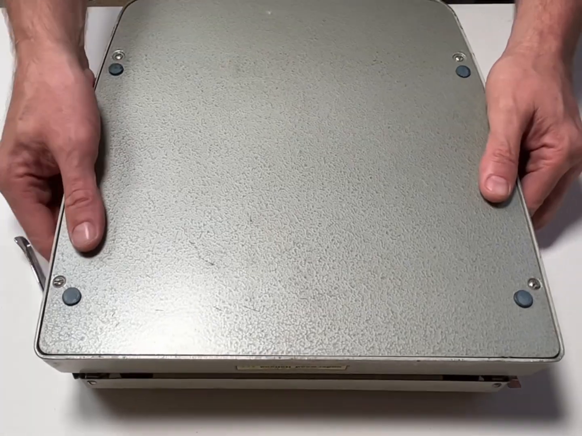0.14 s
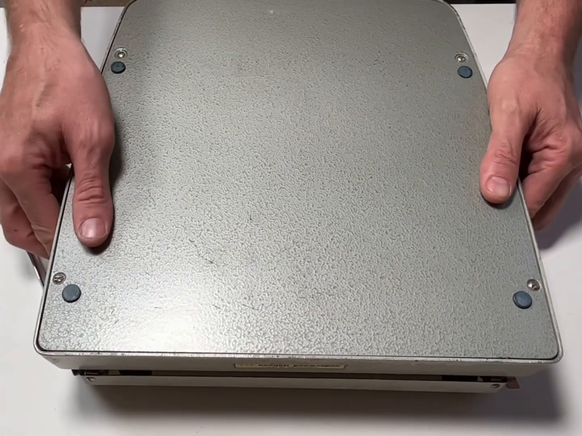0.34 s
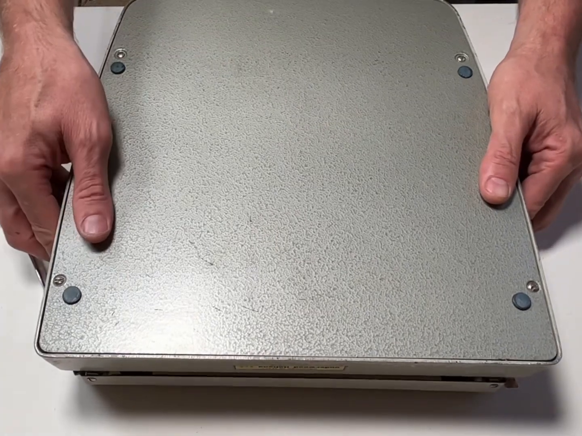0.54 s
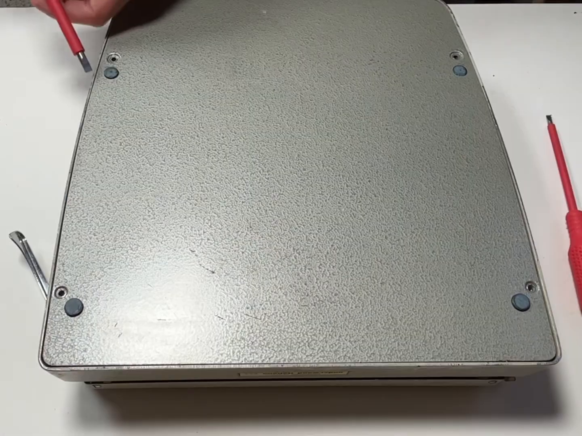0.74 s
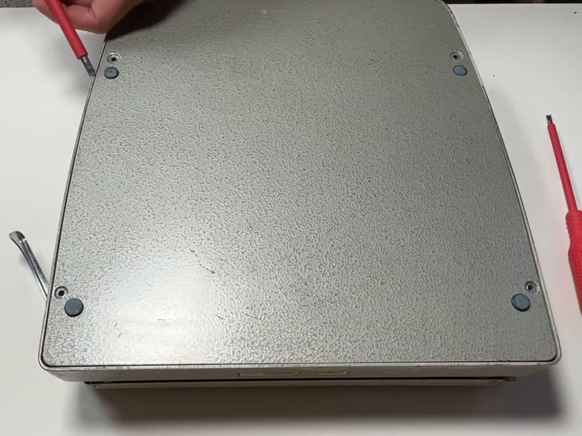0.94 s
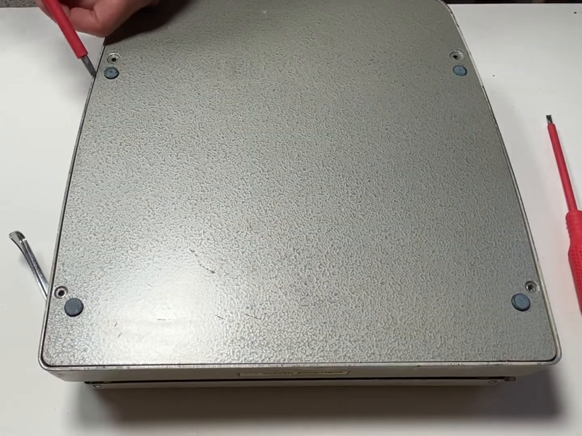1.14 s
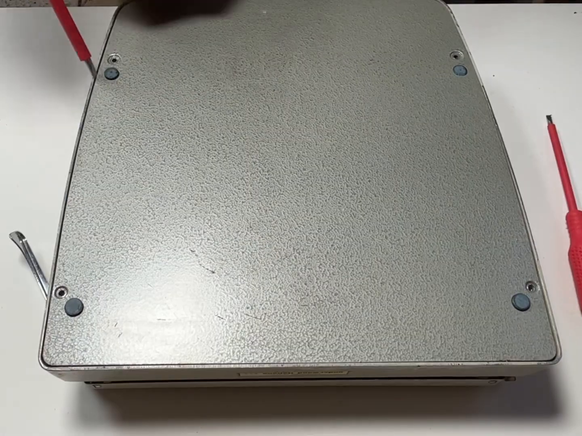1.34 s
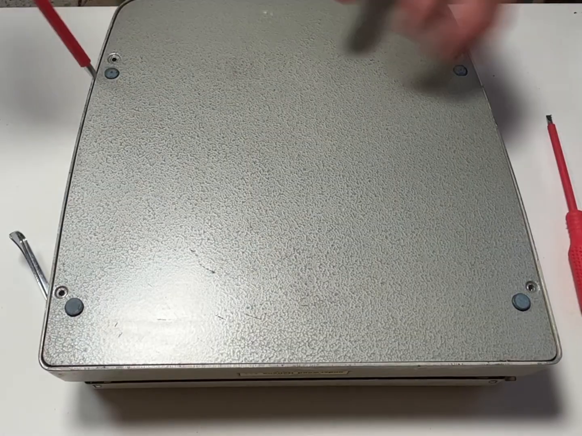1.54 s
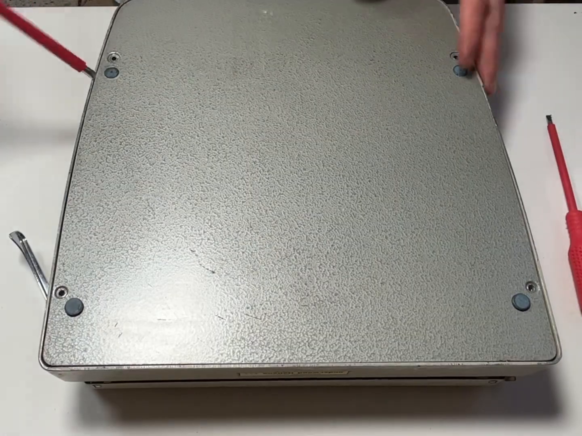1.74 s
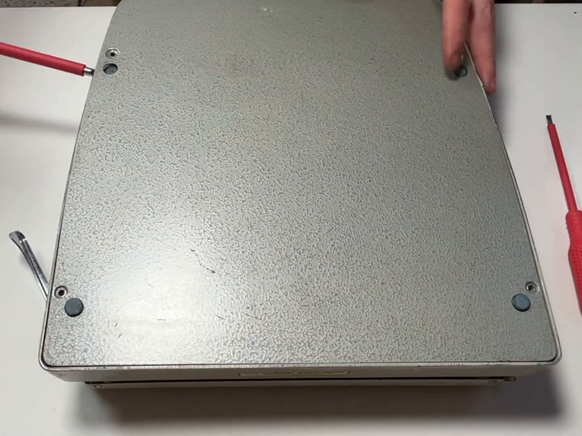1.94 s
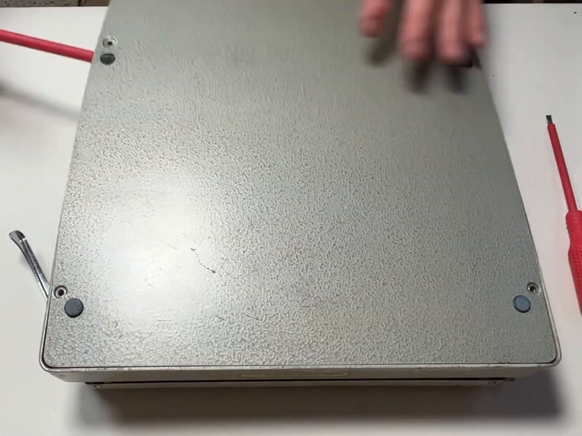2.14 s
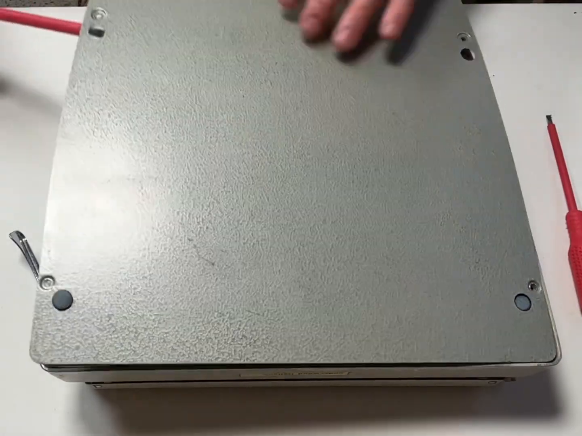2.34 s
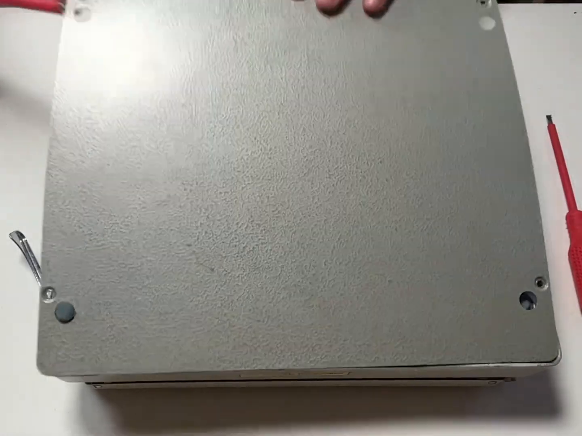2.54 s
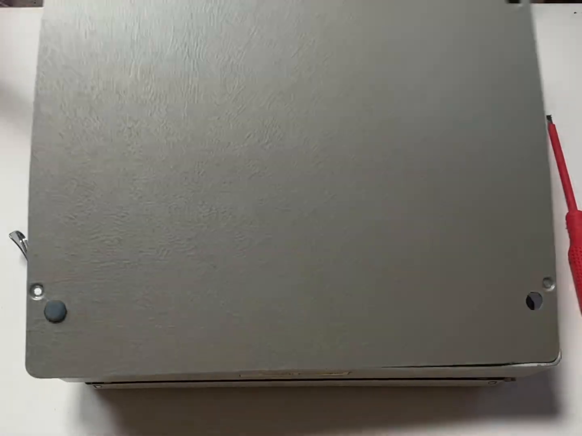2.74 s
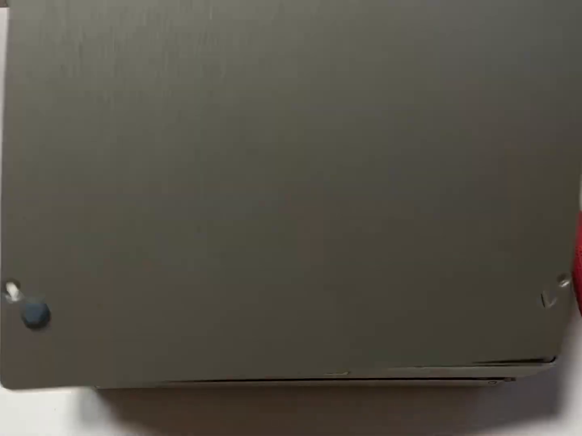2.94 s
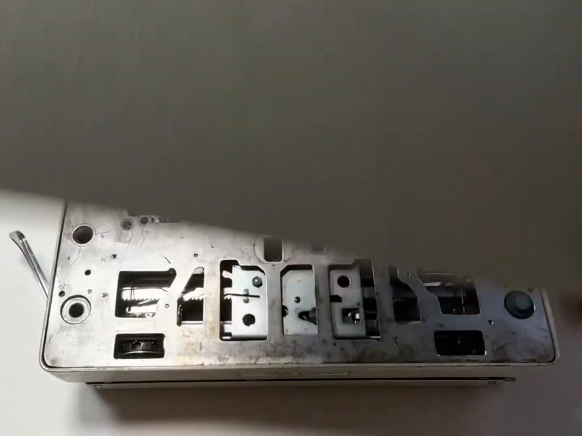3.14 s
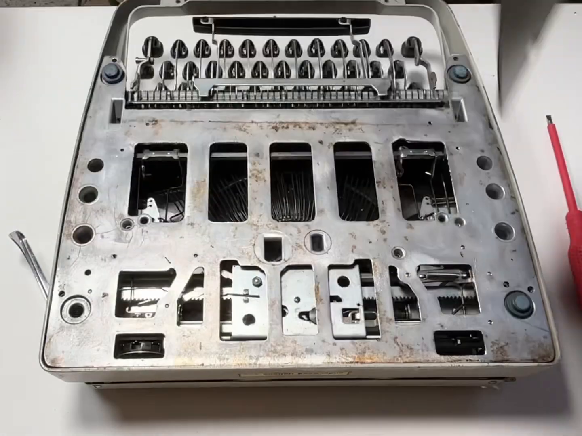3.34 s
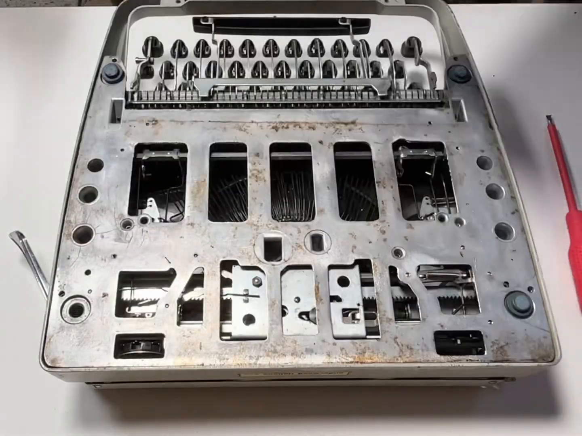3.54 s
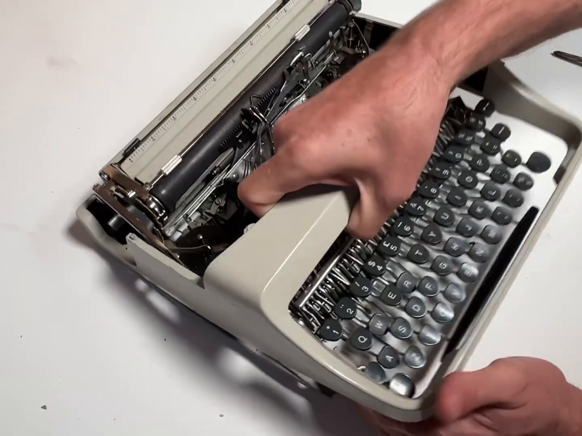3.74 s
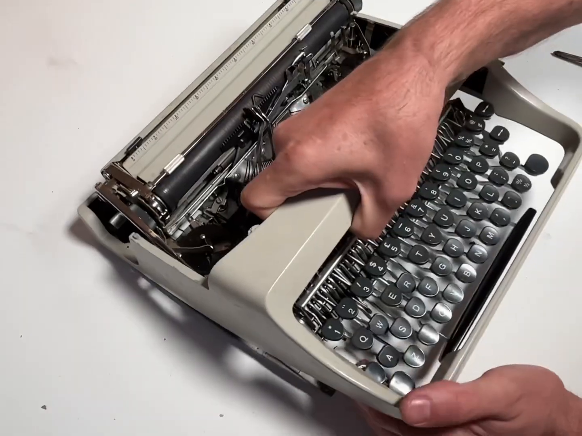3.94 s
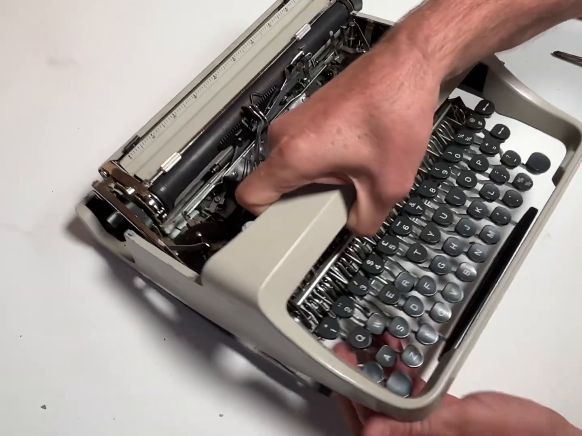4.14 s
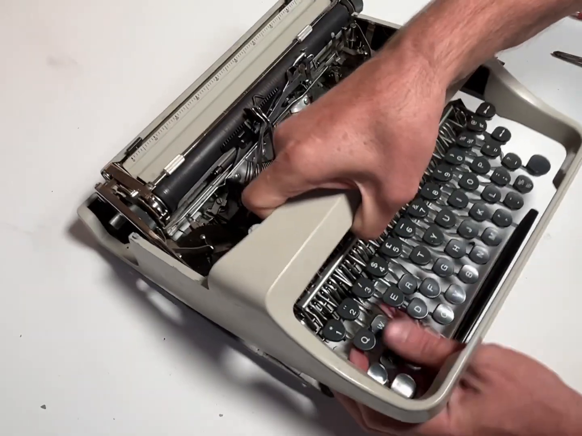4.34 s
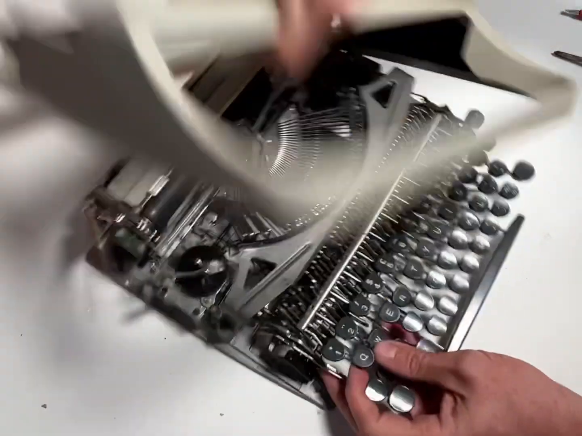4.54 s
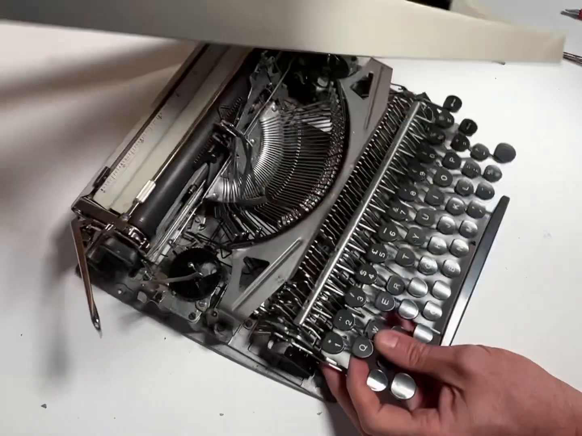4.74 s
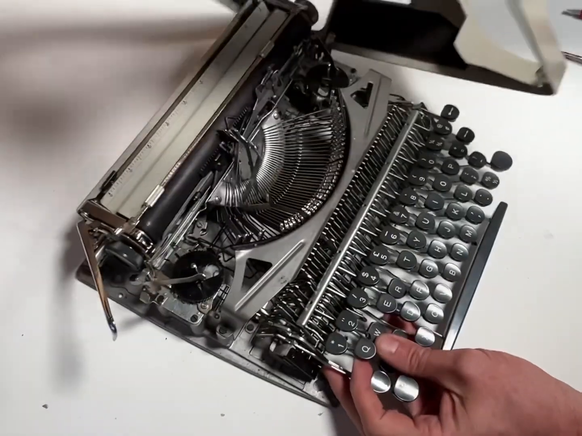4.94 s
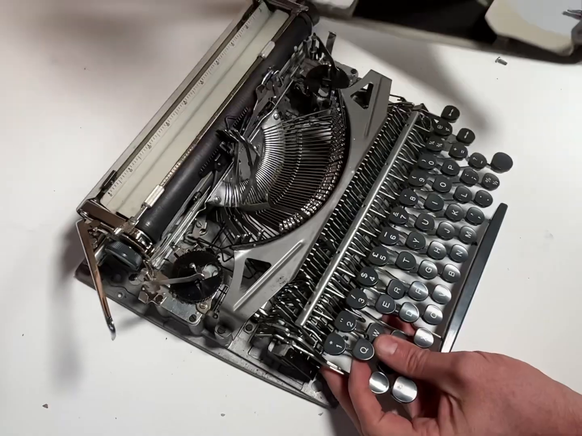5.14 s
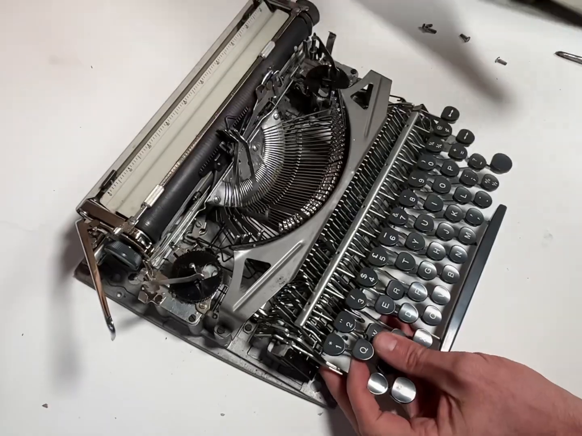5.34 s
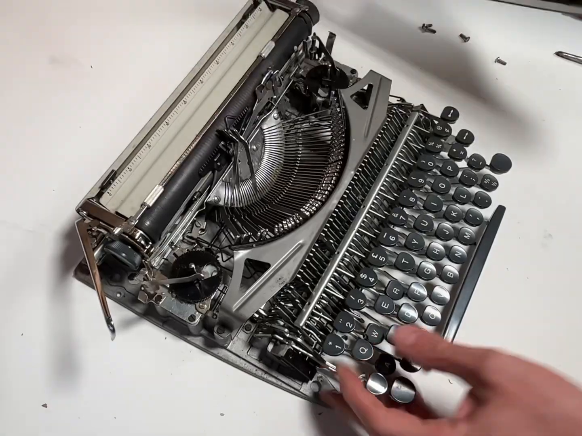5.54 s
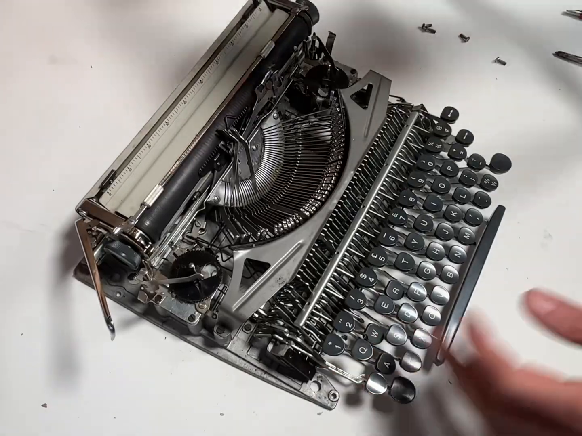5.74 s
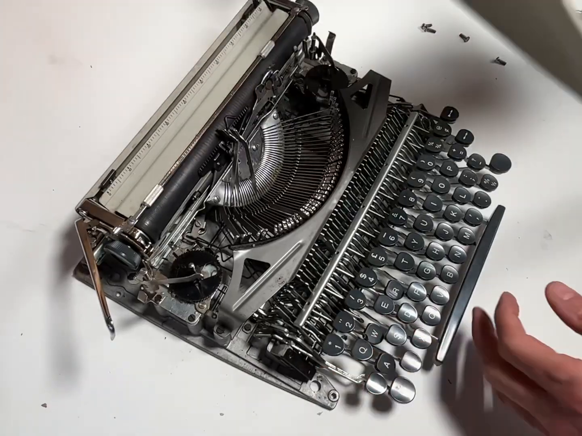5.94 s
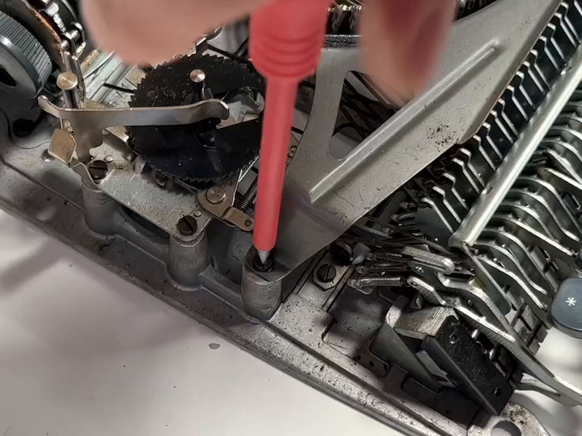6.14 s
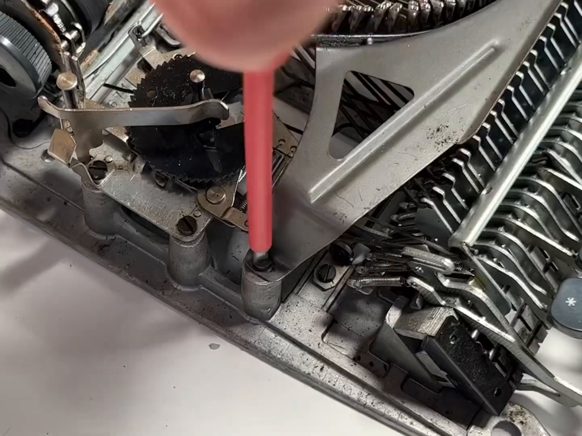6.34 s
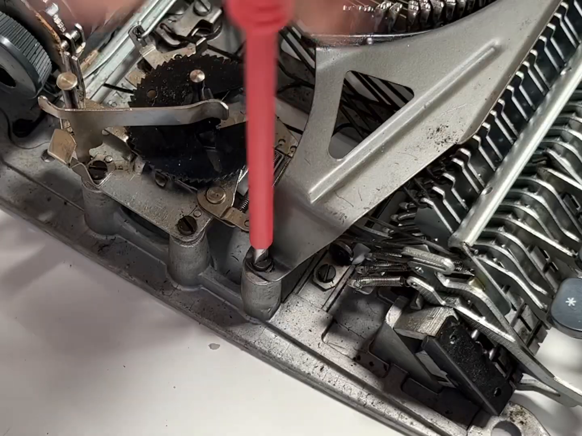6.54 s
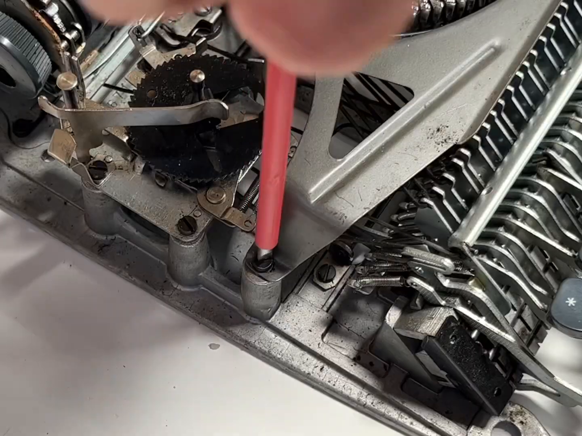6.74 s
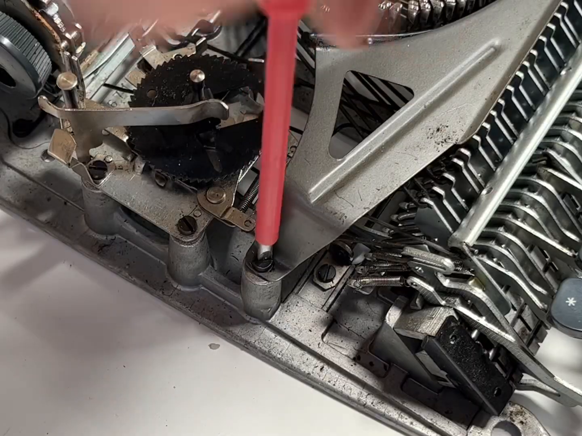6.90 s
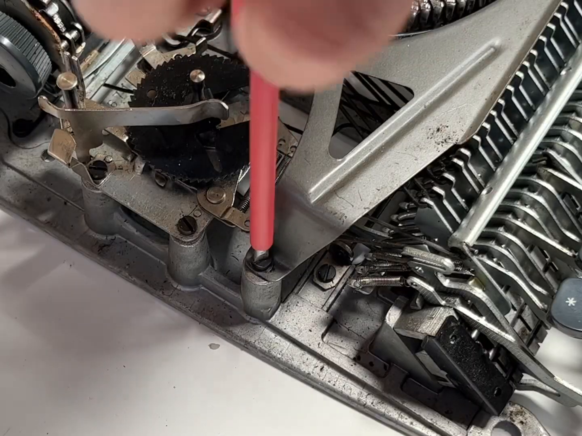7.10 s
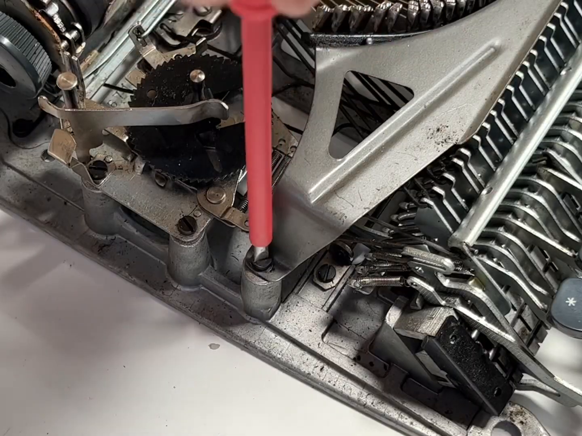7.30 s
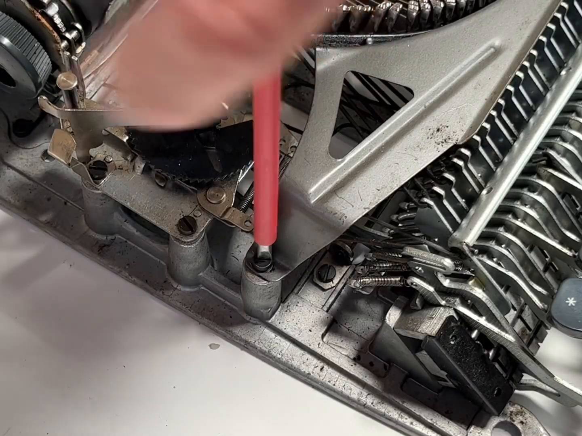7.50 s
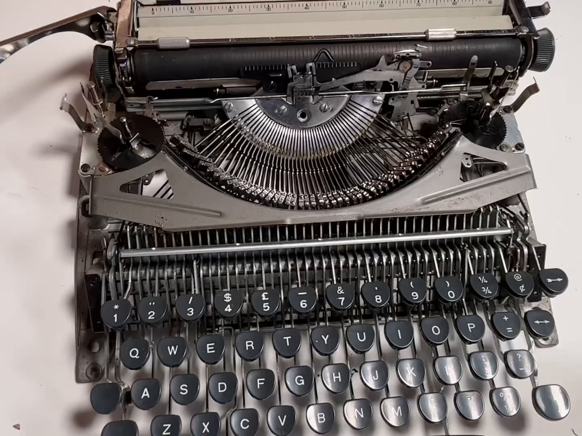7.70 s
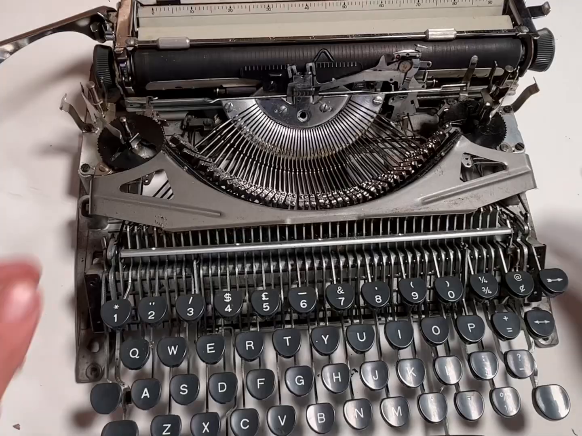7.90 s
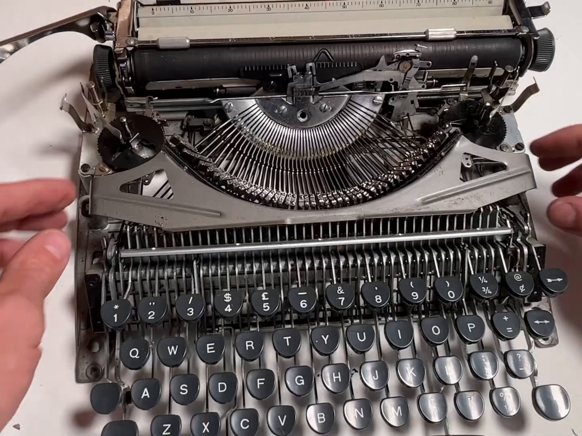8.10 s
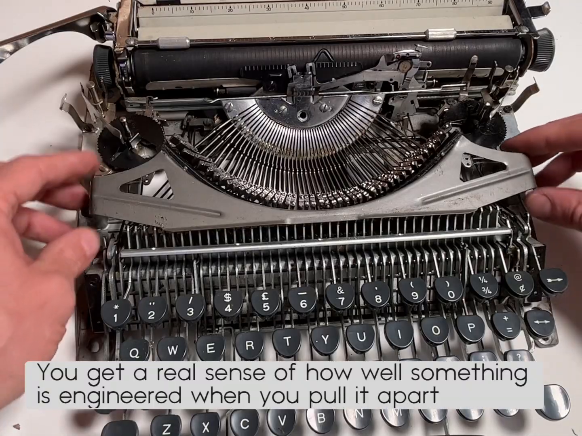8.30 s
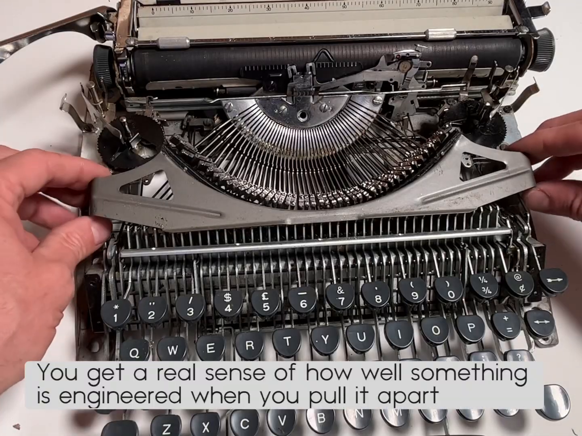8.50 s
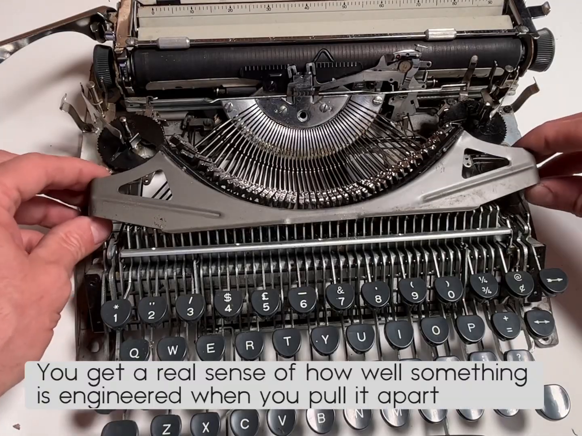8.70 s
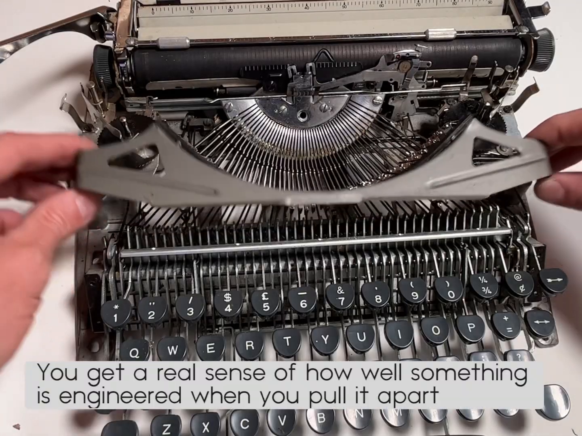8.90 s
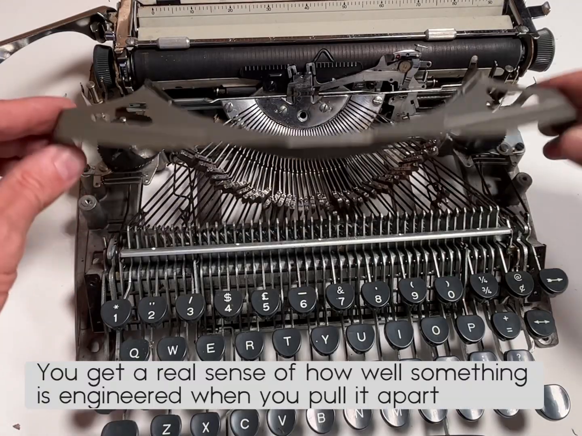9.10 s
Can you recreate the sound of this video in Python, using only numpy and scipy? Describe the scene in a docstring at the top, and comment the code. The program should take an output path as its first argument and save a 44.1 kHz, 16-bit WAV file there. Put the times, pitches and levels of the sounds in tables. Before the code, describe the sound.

A typewriter being taken apart: a sharp double clack and thud first, then scattered ticks, dull knocks and rustling of sheet metal. Midway a shell drags harshly over the mechanism, banging the bench twice in quick bursts. Afterwards only light rubbing, faint scratchy twists under a low outdoor hum, and a final pair of light ringing clicks. Abrupt joins change the low room rumble, heard in close stereo.

```python
"""A typewriter is taken apart on a bench: metal parts click and ring as short noise and fading tones.
Hands and covers scrape as noise gated by tiny slips; the bench top thuds as low tones under each shove.
A street rumbles through the walls as flickering bands of noise; in the fourth of five joined passages
an engine outside drones as one unsteady low tone. Two microphone ports hear it all in stereo."""
import sys
import numpy as np
from scipy import signal
from scipy.fft import rfft, irfft
from scipy.io import wavfile
from scipy.ndimage import uniform_filter1d

SR = 44100
rng = np.random.default_rng(int(sys.argv[2]) if len(sys.argv) > 2 else 0)


def transcribe(signal):
    """Save signal, clipped to [-1, 1], as a 16-bit WAV file at the path in sys.argv[1]."""
    frames = np.atleast_2d(signal).T
    limited = np.clip(frames, -1, 1)
    pcm = np.round(limited * 32767).astype(np.int16)
    wavfile.write(sys.argv[1], SR, pcm)


N = 403956
T = np.arange(N) / SR  # time of every sample [s]
F = np.fft.rfftfreq(N, 1 / SR)  # pitches of the whole-length spectrum [Hz]


def undb(db):
    """Turn decibels into a plain factor."""
    return 10 ** (np.asarray(db) / 20)


def curve(tables):
    """Join tables and read their columns at every sample, with straight lines between rows."""
    s, *columns = np.vstack(tables).T
    return [np.interp(T, s, column) for column in columns]


def unit(x):
    """Scale a sound to an average (RMS) level of 1."""
    return x / np.sqrt(np.mean(x ** 2))


def walk(rate):
    """Wander at random: levels held for 1 / rate seconds, then smoothed twice."""
    k = int(SR / rate)
    held = np.repeat(rng.standard_normal(N // k + 1), k)
    return 1.3 * uniform_filter1d(uniform_filter1d(held, k), k)[:N]


def band(x, lo_hz, hi_hz, order=2):
    """Keep only the pitches between two edges."""
    edges = [lo_hz, min(hi_hz, .45 * SR)]
    return signal.sosfilt(signal.butter(order, edges, "band", fs=SR, output="sos"), x)


def ring(modes, t, spread_db, detune):
    """Strike an object: each mode is a fading tone, with its own detuning and sign in the two rows."""
    hz, db, t60 = np.transpose(modes)[:, None, :, None]
    luck = rng.standard_normal((3, 2, len(modes), 1))
    strength = undb(db + spread_db * luck[0, :1])  # shared by both rows
    fade = np.exp(-np.log(1000) * t / np.maximum(t60, .005))
    sign = np.sign(luck[2])
    sign[0] = 1
    tones = np.sin(2 * np.pi * hz * (1 + detune * luck[1]) * t)
    return (sign * strength * fade * tones).sum(axis=1)


def slips(rate, spread_db, smooth, slip_s, size):
    """Rub two surfaces: noise gated by short slips of uneven strength over a smooth slide."""
    force = undb(spread_db * rng.exponential(size=size)) * (rng.random(size) < rate / SR)
    fading_slips = signal.lfilter([1], [1, -np.exp(-1 / (slip_s * SR))], force)
    grip = smooth + unit(fading_slips)
    return unit(grip * rng.standard_normal((2, size)))


# where each passage starts, then the end of the last: (time [s])
CUTS_S = [0, .5817, 3.604, 6.159, 7.684, 9.2]


def add(out, s, sound):
    """Lay a sound in at s seconds; the next join between passages chops its tail."""
    i = int(s * SR)
    next_cut = min(int(c * SR) for c in CUTS_S if c > s)
    n = min(sound.shape[1], next_cut - i, N - i)
    out[:, i:i + n] += sound[:, :n]


# the colour of the room when quiet, with traffic, and when still: (pitch [Hz], relative level [dB])
QUIET = [(28, -20), (48, -1.5), (70, -2.5), (130, -16), (280, -22), (380, -22), (900, -25.5), (1800, -34.5),
         (3000, -45), (5000, -57)]
TRAFFIC = [(28, -22), (48, -7), (75, -4.5), (130, -12), (360, -26), (800, -20.5), (1270, -33), (1800, -27),
           (2600, -42), (5000, -54)]
STILL = [(28, -42), (48, -2), (130, -12.5), (300, -5.5), (420, -8), (960, -14.5), (1800, -17), (3000, -21),
         (5000, -41)]
# how the room swells, one list per passage: (time [s], rumble level [dB], hush level [dB])
SWELL = [
    [(0.0, -36.5, -42), (0.398, -39, -45.5), (0.58, -38.5, -42)],
    [(0.59, -44.5, -52), (3.49, -46.5, -56.5), (3.6, -45, -55)],
    [(3.61, -42, -52), (4.55, -40.5, -48), (6.15, -41.5, -49)],
    [(6.17, -43, -46), (7.464, -43, -48.5), (7.68, -42, -49)],
    [(7.69, -51.5, -55.5), (8.0, -53.5, -55.5), (9.16, -46, -54.5)],
]


def room():
    """Street rumble and hush: overlapping noise bands flicker alone, coloured and swelling per passage."""
    colours = [QUIET, QUIET, QUIET, TRAFFIC, STILL]
    noise = rfft(rng.standard_normal((2, N)))
    passage = np.searchsorted(CUTS_S, T, "right") - 1
    octave = np.log2(np.maximum(F, 1))
    rumble = hush = 0
    for hz in 28 * 2 ** np.arange(0, 7.6, .5):  # band centres half an octave apart
        share = np.cos(np.pi * np.clip(octave - np.log2(hz), -.5, .5))
        db = np.array([np.interp(np.log(hz), np.log(np.array(c)[:, 0]), np.array(c)[:, 1])
                       for c in colours])
        part = irfft(noise * share, N) * undb(db[passage] + 1.0 * walk(7.1))
        if hz < 200:
            rumble = rumble + part
        else:
            hush = hush + part
    out = np.zeros((2, N))
    for part, db in zip((rumble, hush), curve(SWELL)):
        for k in range(len(colours)):
            here = passage == k
            out[:, here] += unit(part[:, here]) * undb(db[here])
    return out


# the engine outside: (time [s], pitch [Hz], level [dB])
DRONE = [(6.16, 66.7, -45), (6.49, 63.12, -35.5), (7.684, 63.8, -41)]


def drone():
    """Engine outside: one low tone, unsteady in pitch and level, during the fourth passage."""
    hz, db = curve([DRONE])
    unsteady_hz = hz * (1 + 0.023 * walk(20))
    tone = np.sin(2 * np.pi * np.cumsum(unsteady_hz) / SR)
    on = (T > CUTS_S[3]) * (T < CUTS_S[4])
    return np.sqrt(2) * tone * undb(db + 2.4 * walk(25)) * on


# fingers and parts sliding on metal:
# (start time [s], length [s], treble level [dB], body level [dB], body pitch [Hz])
RUB = [(0.0, 0.47, -66.5, -66.5, 2610), (0.876, 0.097, -100, -66, 5500), (1.787, 0.14, -74, -70.5, 4900),
       (2.071, 0.18, -55, -56, 4340), (2.3, 0.34, -69, -77.5, 3170), (3.593, 0.054, -50, -62, 6000),
       (3.619, 0.2, -56, -49, 1300), (3.948, 0.11, -56, -74, 4900), (4.074, 0.17, -66, -70.5, 4070),
       (4.177, 0.14, -44.5, -55.5, 3750), (5.035, 0.18, -68.5, -75.5, 6000),
       (5.259, 0.44, -59.5, -75.5, 4900), (5.677, 0.31, -65, -78, 4950), (5.921, 0.068, -64.5, -68, 4430),
       (7.689, 0.35, -76.5, -76.5, 4650), (8.826, 0.16, -83.5, -75, 5000)]
# turns of a screwdriver: (start time [s], treble level [dB])
TWISTS = [(6.24, -64.5), (6.581, -66), (6.941, -66.5), (7.289, -63), (7.58, -66.5)]
TWIST_S, TWIST_BODY_DB, TWIST_HZ = 0.18, -73.5, 2920  # length, body level and body pitch of each turn
# thin metal parts, for rubbing and clicks: (pitch [Hz], relative level [dB], time to fade by 60 dB [s])
METAL = [(2696, -1.5, 0.13), (3460, 1.5, 0.021), (3900, -1, 0.069), (4230, 3, 0.07), (4688, -7.5, 0.2),
         (5050, -2.5, 0.0795), (12200, 1.5, 0.091)]
AIR_DB = -82.5  # middle level of the faint treble that comes and goes


def rubbing():
    """Strokes swell and fade: slips make a treble rustle and wake the resonances of the touched part."""
    grain = slips(rate=150, spread_db=3.5, smooth=0.97, slip_s=0.0089, size=N)
    treble = unit(band(grain, 3300, 14600) + band(grain, 4100, 8000))
    out = undb(AIR_DB + 3 * walk(3.4)) * unit(band(rng.standard_normal((2, N)), 3500, 14000))
    twists = [(s, TWIST_S, db, TWIST_BODY_DB, TWIST_HZ) for s, db in TWISTS]
    for s, length, treble_db, body_db, hz in RUB + twists:
        i, n = max(int(s * SR), 0), int(length * SR)
        stroke = grain[:, i:i + n]
        body = unit(band(stroke, hz / 1.08, hz * 1.04, order=1)) + unit(band(stroke, hz / 2, 4100))
        # the slips also sing in the metal modes near that pitch
        for f, db, _ in METAL:
            mode_db = db - 16.0 * abs(np.log2(f / hz))
            body = body + undb(mode_db) * unit(band(stroke, f / 1.015, f * 1.015, order=1))
        swell = np.hanning(n) ** 0.8
        out[:, i:i + n] += swell * (undb(treble_db) * treble[:, i:i + n] + undb(body_db) * body)
    return out


# the cover drags and rattles over the mechanism: (time [s], metal level [dB], treble level [dB])
DRAG = [(4.41, -40.5, -48.5), (4.42, -27, -34), (4.455, -21, -25.5), (4.5, -27, -36.5), (4.54, -32.5, -31),
        (4.58, -40, -40), (4.63, -61, -64), (4.7, -52.5, -62), (4.75, -44, -38), (4.78, -34, -53),
        (4.815, -42, -26), (4.85, -34.5, -33), (4.88, -52, -48), (4.93, -58.5, -70)]
# resonances of the cover's metal, then its shell: (pitch [Hz], width [Hz], relative level [dB])
RUB_BODY = [(3100, 150, 0), (3750, 70, 3), (4230, 70, 4), (4700, 90, 3)]
SHELL = [(1050, 400, -2.5), (1400, 410, 0.5), (1750, 150, 4)]
SHELL_DB = -6.5  # the shell against the metal


def dragging():
    """Cover drags over the mechanism: each resonance has its own sparse contacts, so the colour jumps."""
    metal_db, treble_db = curve([DRAG])
    i, j = int(DRAG[0][0] * SR), int(DRAG[-1][0] * SR)

    def contacts():
        """Draw one second of sparse, hard slips."""
        return slips(rate=220, spread_db=3, smooth=.4, slip_s=.004, size=SR)

    layers = ((treble_db, [], 6000, 13800),
              (metal_db, RUB_BODY, 2300, 6000),
              (metal_db + SHELL_DB, SHELL, 600, 2500))
    out = np.zeros((2, N))
    for db, peaks, lo_hz, hi_hz in layers:
        sound = undb(-6) * band(contacts(), lo_hz, hi_hz)
        for hz, width, peak_db in peaks:
            sound = sound + undb(peak_db) * band(contacts(), hz - width / 2, hz + width / 2, order=1)
        out[:, i:j] += undb(db[i:j]) * unit(sound)[:, :j - i]
    return out * np.clip((DRAG[-1][0] - T) / 0.058, 0, 1)  # fade out at the end


# shoves that reach the bench top:
# (time [s], level [dB], knock against that level [dB], extra for bench modes below 100 Hz [dB])
THUDS = [(0.528, -22.5, -10.5, 2), (0.565, -35.5, 1.5, 5), (1.456, -49.5, 17, 7), (1.4682, -31, 8, -9),
         (1.815, -48, 9.5, 1), (1.837, -38, -1.5, -9), (1.885, -38, -1, 2), (1.919, -43, 9.5, 6),
         (2.087, -52.5, 10, -1), (2.116, -31.5, -3, -2.5), (2.173, -36.5, 7.5, 4), (2.199, -39.5, 5, 2),
         (2.352, -54, 11, -4), (2.589, -59.5, 16, -8), (3.615, -36.5, -23, 2), (3.733, -29, -11, -3),
         (3.945, -27.5, -25.5, -4), (4.169, -37.5, -22, -4.5), (4.432, -14, -15, 2.5),
         (4.444, -9.5, -13.5, 2.5), (4.49, -16, -6, -0.5), (4.542, -19.5, -10, 3), (4.601, -27, -22, 0.5),
         (4.699, -32.5, -12.5, -1.5), (4.769, -21.5, -17.5, -2.5), (4.812, -10.5, -4, -3),
         (4.844, -10.5, -16.5, -4), (4.928, -25.5, -17, 0.5)]
# modes of the bench top: (pitch [Hz], relative level [dB], time to fade by 60 dB [s])
BENCH = [(44.14, -1, 0.29), (69.4, -1, 0.24), (120.25, 2.5, 0.24), (139.5, -7.5, 0.19)]
# dull knocks of the part in hand: (pitch [Hz], relative level [dB], time to fade by 60 dB [s])
PLATE_KNOCK = [(358, -14, 0.084), (501, 7, 0.055), (593, -2.5, 0.084), (1090, -8, 0.037)]
FRAME_KNOCK = [(248.3, -1, 0.18), (285, 5, 0.074), (414, -5.5, 0.16), (618, -16.5, 0.21), (985, -5.5, 0.14)]
KNOCKS = [PLATE_KNOCK, PLATE_KNOCK, FRAME_KNOCK]  # for the first three passages


def thuds():
    """A soft push of some milliseconds sets off the bench top's modes and a dull knock of the part."""
    out, t = np.zeros((2, N)), np.arange(int(.5 * SR)) / SR
    next_starts = [row[0] for row in THUDS[1:]] + [np.inf]
    for (s, level_db, knock_db, deep_db), after in zip(THUDS, next_starts):
        bench = [(hz, db + deep_db * (hz < 100), t60) for hz, db, t60 in BENCH]
        top = np.minimum(t / 0.0075, 1) * ring(bench, t, spread_db=1.5, detune=0.069)
        top = top * np.exp(-np.maximum(t - (after - s), 0) / .012)  # the next shove stills the bench
        modes = KNOCKS[np.searchsorted(CUTS_S, s) - 1]
        knock = np.minimum(t / 0.0026, 1) * ring(modes, t, spread_db=2.5, detune=0.036)
        # the many close modes of the part blur into a short dull noise
        blur = unit(band(rng.standard_normal((2, len(t))), 200, 740))
        knock = knock + 0.291 * np.exp(-t / 0.032) * blur
        add(out, s, undb(level_db) * (top + undb(knock_db) * knock))
    return out


# loose parts, one table each: (pitch [Hz], relative level [dB], time to fade by 60 dB [s])
COVER = [(512, -1, 1.15), (720, -8, .3), (910, -4, .2), (1034, -3, .3), (1588, -3, .1), (3880, -10, .2)]
CASE = [(1250, 3, 0.05), (1566, 5, 0.046), (1800, 6, 0.049)]
LEVER = [(1100, -12, 0.16), (1580, -13, .1), (3300, -7.5, 0.16), (3750, 2.5, .12), (4300, -7.5, 0.13)]
PLATE = [(4190, -0.5, 0.099), (4340, 4, 0.063)]
BRACKET = [(1360, 2.5, 0.12), (1810, -5, .07), (2380, -4, .06), (2885, 1.5, 0.21), (4300, 4, 0.13),
           (5390, 11.5, 0.12)]
# loose parts that ring on after a blow: (time [s], level [dB], part)
FREE_RINGS = [(.519, -25.5, CASE), (1.467, -43.5, PLATE), (2.116, -35.5, PLATE), (4.197, -37.5, LEVER),
              (4.211, -35, LEVER), (4.228, -36.5, LEVER), (4.8151, -30.5, COVER), (4.9682, -37, COVER),
              (8.799, -50, BRACKET), (8.827, -50, BRACKET)]


def loose_parts():
    """After a blow a loose part rings freely in its own fading modes."""
    out, t = np.zeros((2, N)), np.arange(SR) / SR
    for s, db, part in FREE_RINGS:
        add(out, s, undb(db) * np.minimum(t / 0.0011, 1) * ring(part, t, spread_db=1, detune=0.001))
    return out


# metal on metal:
# (time [s], level [dB], brightest pitch [Hz], clack against the crack [dB], clack pitch [Hz])
CLICKS = [(0.5188, -32, 4530, 5.5, 1800), (0.5646, -32.5, 11900, 5, 950), (0.711, -65, 11500, -6, 1500),
          (0.8921, -50, 2200, 14, 800), (1.458, -57, 2470, 8, 815), (1.464, -32, 5560, -5.5, 1100),
          (1.8812, -45, 2470, 1, 1170), (1.9207, -52, 4100, 12.5, 920), (2.114, -31, 5000, -33, 1500),
          (2.147, -42.5, 3230, -6, 1750), (2.1709, -33, 5800, -2, 2550), (2.2007, -37, 3070, -2, 1500),
          (2.434, -62.5, 4830, 14.5, 940), (3.6068, -44, 3750, 0, 911), (3.6323, -47.5, 3210, -3, 1060),
          (3.9401, -70, 2523, 29, 1240), (4.0278, -39.5, 11260, -15, 970), (4.1971, -46.5, 3930, -1, 861),
          (4.231, -34, 3474, -5.5, 1500), (4.3765, -27.5, 12940, -15, 1000), (4.413, -28, 4380, 5.5, 1508),
          (4.4206, -28.5, 4550, 4.5, 1300), (4.4383, -22.5, 4720, 4.5, 1250),
          (4.4535, -21.5, 4230, -4.5, 1550), (4.4605, -20.5, 7230, -3.5, 1301),
          (4.486, -26.5, 7500, 1.5, 942), (4.49, -26, 3680, 0, 933), (4.5304, -30, 3750, -5.5, 1750),
          (4.769, -42, 4700, -5, 1100), (4.7982, -45, 2984, 22.5, 1100), (4.8045, -24, 2910, 8, 1000),
          (4.809, -25, 4350, 9.5, 1100), (4.816, -29.5, 3520, 4, 1400), (4.9666, -47.5, 4100, 10, 1040),
          (5.418, -46, 5050, 12.5, 1100), (5.8706, -51.5, 8100, 3, 850), (8.6796, -62.5, 7830, 11.5, 4700),
          (8.7971, -34.5, 5390, -1, 1990), (8.826, -38.5, 4520, -3.5, 1810), ]
RING_DB = -8  # metal modes against the crack
CRACK_T60_S, TAIL_DB, TAIL_T60_S = 0.037, -15, 0.27  # crack fade; level and fade of the room reflections


def clicks():
    """Metal hits metal: a tick, a bright noisy crack, a lower clack, near modes and a faint room tail."""
    out, t = np.zeros((2, N)), np.arange(int(.4 * SR)) / SR
    rise = np.minimum(t / .001, 1)
    snap = 0.4 * np.exp(-t / 0.000347)  # the first touch is a broad, very short tick
    tail = undb(TAIL_DB) * np.exp(-np.log(1000) * t / TAIL_T60_S)
    fall = np.exp(-np.log(1000) * t / CRACK_T60_S) + tail
    for s, level_db, hz, low_db, low_hz in CLICKS:
        burst = rng.standard_normal((2, len(t)))
        bright = unit(band(burst, hz / 1.08, hz * 1.056, order=1))
        broad = undb(-1.5) * unit(band(burst, 1600, 11000, order=1))
        clack = unit(band(burst, low_hz / 1.18, low_hz * 1.2, order=1) + 0.22 * band(burst, 730, 2800))
        crack = bright + broad + undb(low_db) * clack
        # modes lose 35 dB per octave away from the brightest pitch
        near = [(f, db - 35 * abs(np.log2(f / hz)), t60) for f, db, t60 in METAL]
        metal = undb(RING_DB) * ring(near, t, spread_db=4.5, detune=0.0056)
        add(out, s, undb(level_db) * (snap * burst + rise * fall * crack + rise * metal))
    return out


SPLICE_DB = -25  # size of the jump


def splice():
    """A sudden downward jump that settles in milliseconds ticks where the fourth passage starts."""
    out = np.zeros((2, N))
    step = -undb(SPLICE_DB) * np.exp(-T[:SR // 100] / 0.0037)
    add(out, CUTS_S[3] + .0004, step * np.array([[1], [0]]))
    return out


def scene():
    """Add all layers: row 0 reaches both ports alike, row 1 is the share that differs between them."""
    out = room() + rubbing() + dragging() + thuds() + loose_parts() + clicks() + splice()
    out[0] += drone()
    return out


# the two microphone ports: (pitch [Hz], likeness [0-1], left minus right level [dB])
PORTS = [(40.05, 1, 1.5), (129, 0.97, 0), (304.6, 0.7, -3.5), (567, 0, -4), (1000, 0.2, 0.5),
         (1500, 0.32, 1.5), (2600, 0, -0.5), (4630, 0.5, -4.5), (5560, 1, 1.5), (17100, 1, -2.5)]
# how far the left port lags the right: (pitch [Hz], lag [radians])
LAG = [(0, 0), (130, .05), (300, .4), (900, .7), (1500, .2), (2600, -2), (4000, -1), (5000, -1.7),
       (5950, -np.pi), (14700, -5 * np.pi), (17000, -5 * np.pi)]
BOTTOM_HZ, TOP_HZ = 39.7, 16000  # pitches below and above are cut


def record(dry):
    """The two ports mix the rows, lag and differ in level; deep bass and top treble are cut."""
    at, like, tilt_db = np.transpose(PORTS)
    like = np.clip(np.interp(F, at, like), 0, .999)
    same, other = rfft(dry) * np.sqrt([(1 + like) / 2, (1 - like) / 2])
    # half of the lag and level difference goes to each port
    turn = np.exp(.5j * np.interp(F, *np.transpose(LAG))) / undb(np.interp(F, at, tilt_db) / 2)
    pair = irfft([(same + other) / turn, (same - other) * turn], N)
    pair = signal.sosfilt(signal.butter(3, BOTTOM_HZ, "high", fs=SR, output="sos"), pair)
    pair = np.tanh(pair)  # the loudest peaks are rounded
    return signal.sosfilt(signal.ellip(10, .2, 80, TOP_HZ, fs=SR, output="sos"), pair)


dry = scene()
out = record(dry)
transcribe(out)
```